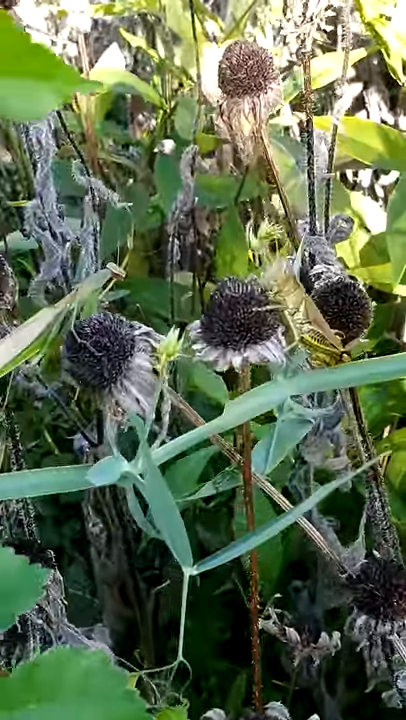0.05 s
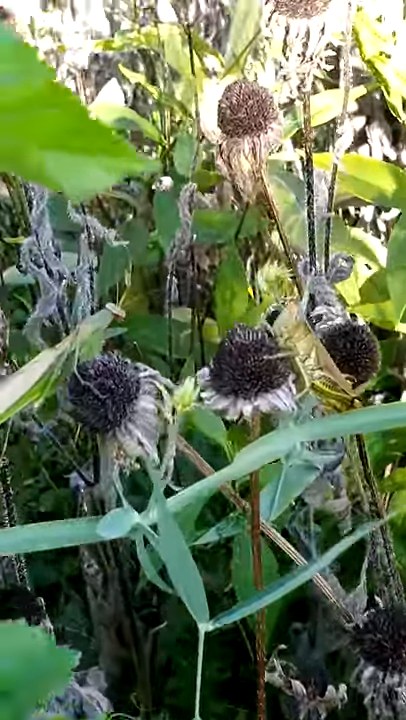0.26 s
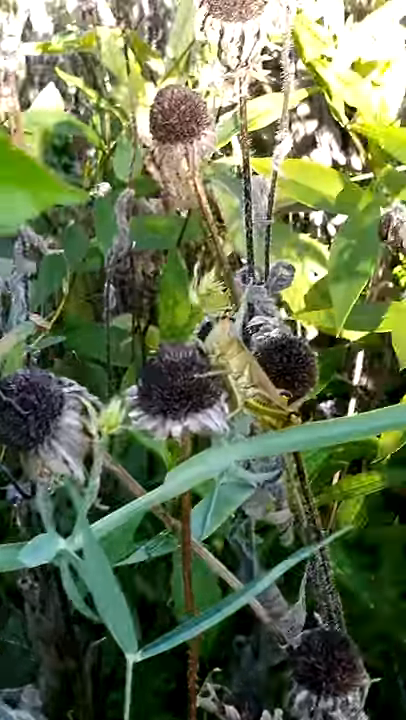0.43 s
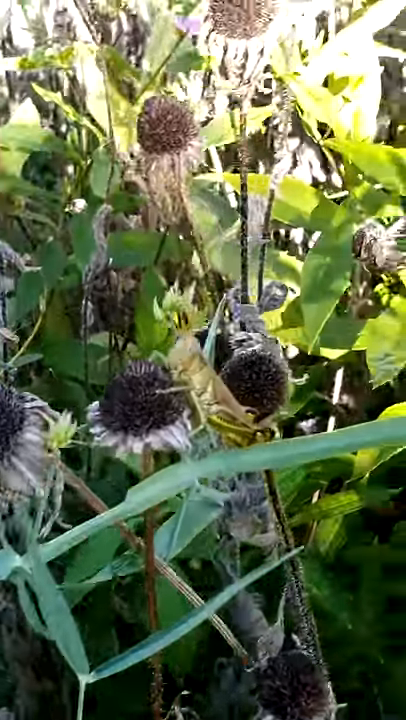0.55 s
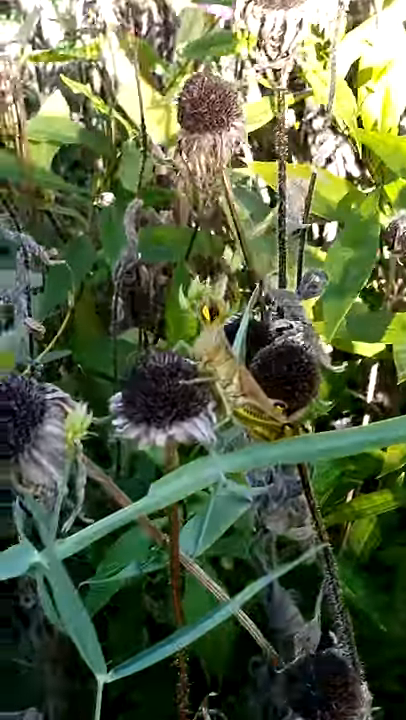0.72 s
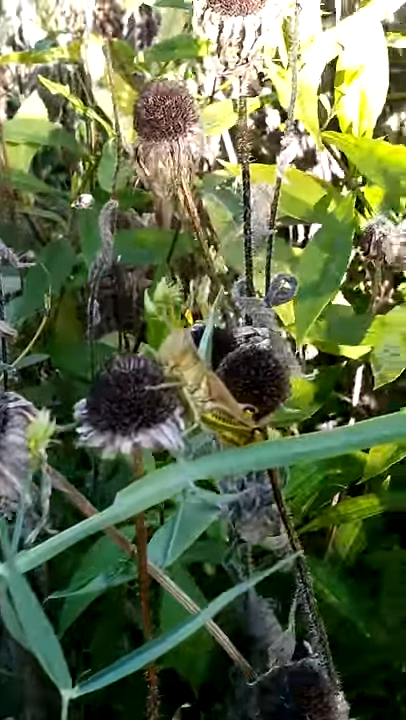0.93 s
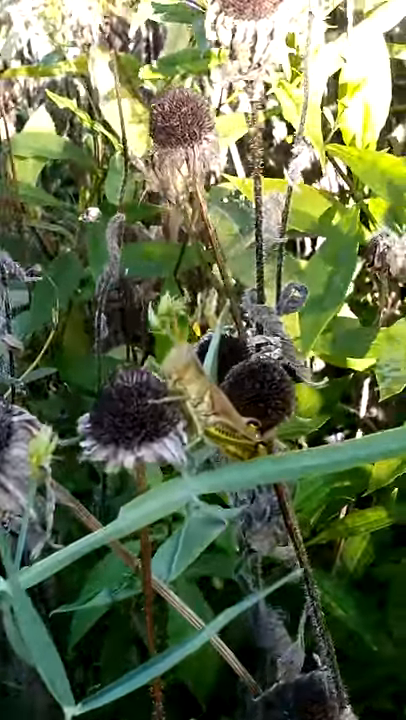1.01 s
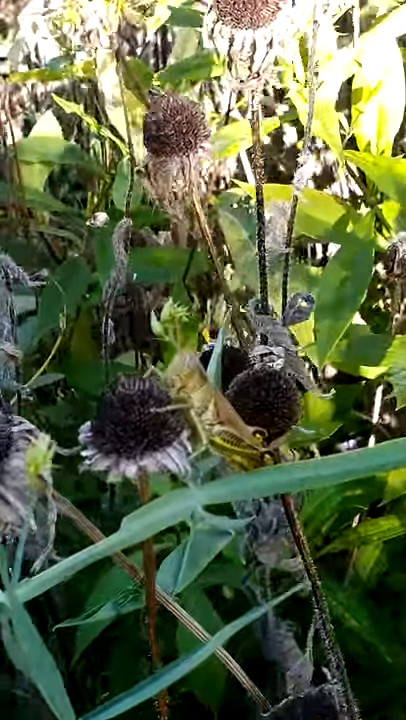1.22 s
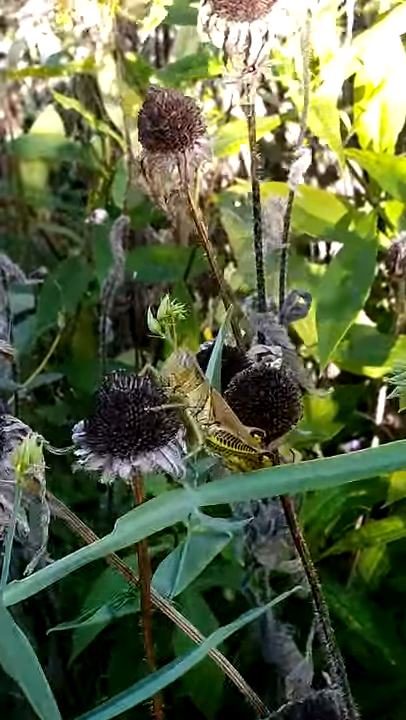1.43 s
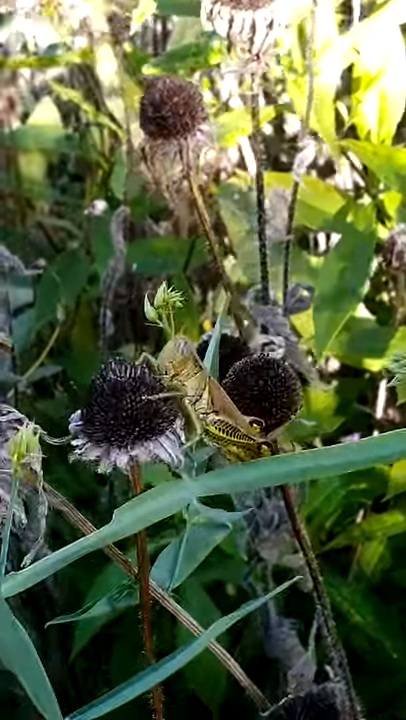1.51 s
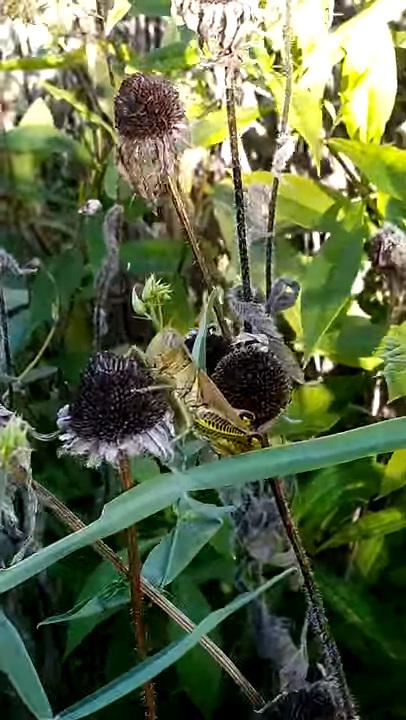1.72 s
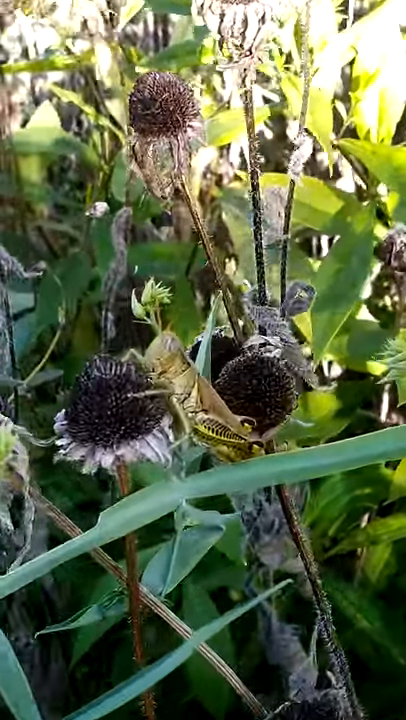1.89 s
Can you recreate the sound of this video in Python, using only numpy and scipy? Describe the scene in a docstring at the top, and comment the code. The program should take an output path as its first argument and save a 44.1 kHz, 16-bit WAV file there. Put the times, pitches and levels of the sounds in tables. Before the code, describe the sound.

Crickets chirp close by in short, high, uneven bursts in a weed patch, while fainter insects trill and buzz further off. Leaves rustle briefly at the start, and the hand-held microphone picks up soft bumps over a low, traffic-like rumble.

```python
"""A ground cricket's chirp, a brush of leaves and a few dry stem ticks open a sunny weed patch.
The crickets chirp on up front, each chirp a short run of wing strokes, while fainter insects
peep, trill and buzz further off. The hand-held microphone picks up soft bumps and two knocks.
Underneath sits a bed of light rumble and steady wash, probably distant traffic, with a far drone
and a hum that swell and fade."""
import sys
import numpy as np
from scipy import signal
from scipy.fft import rfft, irfft
from scipy.io import wavfile
from scipy.ndimage import uniform_filter1d

SR = 44100
rng = np.random.default_rng(int(sys.argv[2]) if len(sys.argv) > 2 else 0)


def materialize(psi):
    """Save the field psi as 16-bit PCM at rate SR to the path in sys.argv[1].

    A 1-D psi becomes a single channel; in a 2-D psi each row is a channel.
    """
    bounded = np.clip(np.atleast_2d(psi).T, -1, 1)
    quanta = np.round(bounded * 32767).astype(np.int16)
    wavfile.write(sys.argv[1], SR, quanta)


N = 85995
T = np.arange(N) / SR

# Pan is left minus right; likeness is the correlation of the two sides.
# rumble, traffic wash and leaf hiss: f/Hz, level/dB
AIR_SPECTRUM = [(30, -2), (62, 21), (180, 18), (255, 8), (480, 11), (640, 1.5), (950, 0.37), (1400, -5),
                (2000, -13.5), (2700, -15), (3150, -29), (3600, -21), (5200, -22.5), (5800, -18),
                (9300, -20), (10500, -28), (14500, -40)]
# stereo image of that bed: f/Hz, pan/dB, likeness
AIR_IMAGE = [(60.7, 5.5, -0.66), (248, 4.5, -1.008), (560, 6.5, -0.72), (820, 4, 0.003), (1940, 10, 0.23),
             (3700, 6, -0.057), (6400, 11, -0.13), (11000, 2.5, 0.35)]
# colour of the far drone: f/Hz, level/dB
DRONE_SPECTRUM = [(220, -51), (305, 1), (385, 1), (440, -0.5), (520, -44.5)]
# its fader ride: t/s, level/dB
DRONE_RIDE = [(0, -58), (.24, -41), (.48, -46.5), (.61, -42.5), (.82, -60)]
# swells of a distant hum: t/s, f/Hz, level/dB
HUM_SWELLS = [(.62, 445, -42), (.95, 490, -45), (1.15, 460, -46), (1.41, 485, -47)]
# handling bumps: t/s, half-width/s, level/dB, pan/dB
BUMPS = [(0.448, 0.24, -37, 8), (0.72, 0.022, -29, 16), (0.901, 0.009, -28, 17), (0.957, 0.013, -41, -11),
         (1.1, 0.065, -37, -10.5), (1.134, 0.03, -27, -2.5), (1.246, 0.032, -36.5, -6),
         (1.374, 0.0084, -25, 11), (1.68, 0.0032, -27.5, 28)]
# their colour: f/Hz, level/dB
BUMP_SPECTRUM = [(25, -58), (45, -3), (78, 3), (120, -6), (185, -15), (280, -29), (1500, -79)]
# knocks on the microphone case: t/s, level/dB
KNOCKS = [(.7185, -27), (1.13, -29)]
# modes of the case: f/Hz, level/dB, t60/s
CASE_MODES = [(118, 0, .075), (205, -4, .045), (330, -8, .025)]
# colour of brushing leaves: f/Hz, level/dB
LEAF_SPECTRUM = [(500, -34), (1400, 13.5), (2400, 4.5), (3100, -20), (4200, 2), (14000, -12)]
# dry stem ticks: t/s, level/dB, f/Hz, t60/s, pan/dB
STEM_TICKS = [(.0672, -33, 8600, .012, 16), (.073, -43, 8400, .04, 11), (.1152, -42, 8400, .014, 13),
              (.1192, -39, 7900, .025, 13), (.2495, -47.5, 7000, .014, 12), (.3415, -47, 5800, .012, 10),
              (1.5425, -51, 13000, .014, 8)]
# colour of the insect buzz: f/Hz, level/dB
BUZZ_SPECTRUM = [(4500, -20), (6000, -7.5), (7500, -2), (8800, -1), (10300, -17), (15000, -26.5)]
# its fader ride: t/s, level/dB
BUZZ_RIDE = [(0, -59.5), (.17, -58), (.72, -67.5), (.87, -60), (1.28, -62), (1.4, -56), (1.75, -55.5),
             (1.95, -57.5)]
# peeps of far, lower-pitched insects: t/s, f/Hz, level/dB
PEEPS = [(.48, 4900, -64), (0.519, 4920, -63), (0.561, 4920, -64), (.717, 4350, -68), (0.762, 4450, -64),
         (.895, 4940, -66), (.935, 4950, -63), (0.98, 4950, -64), (1.416, 4950, -62.5), (1.456, 4950, -62)]
# near chirps: t/s, first to last stroke/s, f/Hz, level/dB, fall per stroke/Hz, pan/dB
CHIRPS = [(.003, .064, 6900, -44.5, 450, 7), (0.199, .11, 6030, -56.5, 600, 12),
          (0.285, .13, 7370, -53.5, 204, 5), (0.571, .046, 7600, -40, 380, 27),
          (0.569, .073, 8430, -53, 250, 0), (0.826, .13, 7320, -45, 200, 11.5),
          (0.833, .09, 6560, -50, 497, 10), (0.87, .051, 6930, -52, 496, 38),
          (0.995, .046, 7620, -39.5, 200, 14), (1.126, .059, 7310, -41, 202, 12.5),
          (1.363, .046, 7680, -41, 310, 29), (1.386, .06, 7280, -42, 150, 24),
          (1.443, .092, 6700, -49, 400, 2.5), (1.702, .045, 7730, -41, 400, 25),
          (1.704, .048, 7280, -40.5, 300, 11)]

CYCLES_PER_STROKE = 87.5   # a faster wing gives both a higher pitch and quicker strokes
STROKE_SHARE = .97   # sounding part of each stroke period
FAR_SWING_DB, FAR_PAN_DB = 4, 5
PEEP_FALL_HZ, PEEP_JITTER_HZ = 160, 90


def from_db(db):
    """Decibels to gain."""
    return 10 ** (np.asarray(db) / 20)


def pan(db):
    """Left and right gains; the right sits db below the left."""
    return np.array([[1], [from_db(-db)]])


def ride(rows):
    """Gain along a fader curve of t/s, level/dB."""
    return from_db(np.interp(T, *np.transpose(rows)))


def at_hz(rows, column=1):
    """A table column spread over every frequency bin."""
    rows = np.array(rows)
    return np.interp(np.log(np.arange(N // 2 + 1) * SR / N + 1), np.log(rows[:, 0]), rows[:, column])


def drift(rate_hz):
    """Smooth random modulation at unit rms."""
    pole = np.exp(-2 * np.pi * rate_hz / SR)
    return rms_one(signal.lfilter([1], [1, -2 * pole, pole * pole], rng.standard_normal(2 * N))[N:])


def rms_one(x):
    """Scale to unit rms."""
    return x / np.sqrt(np.mean(x ** 2) + 1e-20)


def noise(spectrum, pan_db, likeness=0):
    """Coloured stereo noise, unit rms on the left."""
    shared, separate = rfft(rng.standard_normal((2, N)))
    likeness = np.clip(likeness, -1, 1)
    colour = from_db(at_hz(spectrum))
    blend = likeness * shared + np.sqrt(1 - likeness ** 2) * separate
    left, right = irfft(shared * colour, N), irfft(blend * colour * from_db(-pan_db), N)
    return np.array([left, right]) / left.std()


def air_bed():
    """Steady outdoor rumble, wash and hiss."""
    return from_db(-37) * noise(AIR_SPECTRUM, at_hz(AIR_IMAGE), at_hz(AIR_IMAGE, column=2))


def far_drone():
    """A low band of noise, probably a vehicle, swells and fades."""
    return ride(DRONE_RIDE) * noise(DRONE_SPECTRUM, pan_db=4.5, likeness=-.66)


def far_hum(swell_s=.04, wander_hz=28, lag_s=.0007):
    """Bell-shaped swells of a wavering tone, reaching the right a moment later."""
    tone = 0
    for s, hz, db in HUM_SWELLS:
        swell = np.exp(-.5 * ((T - s) / swell_s) ** 2)
        phase = 2 * np.pi * np.cumsum(hz + wander_hz * drift(wander_hz)) / SR
        tone = tone + from_db(db) * swell * np.sqrt(2) * np.sin(phase)
    return pan(4.5) * np.array([tone, np.interp(T - lag_s, T, tone)])


def handling_bumps():
    """The hand bumps the microphone: a levelled low shudder under bell-shaped swells."""
    power = sum((pan(pan_db) * from_db(db)) ** 2 * np.exp(-((T - s) / width) ** 2)
                for s, width, db, pan_db in BUMPS)
    shudder = noise(BUMP_SPECTRUM, pan_db=0, likeness=-.27)
    running_rms = np.sqrt(uniform_filter1d(shudder ** 2, size=1100) + 1e-6)
    return np.sqrt(power) * shudder / running_rms


def case_knocks():
    """Hard bumps set the case's well-damped modes thudding."""
    out = 0
    for s, db in KNOCKS:
        age = np.maximum(T - s, 0)
        for k, (hz, mode_db, t60) in enumerate(CASE_MODES):
            ring = from_db(db + mode_db - 60 * age / t60) * np.sin(2 * np.pi * hz * age)
            out = out + (-1) ** k * ring
    return pan(1) * out


def leaf_brush(fade_db_per_s=44):
    """Leaves brush past at the top of the scene, a quickly fading rustle."""
    return from_db(-48 - fade_db_per_s * T) * noise(LEAF_SPECTRUM, pan_db=14)


def stem_ticks(width_hz=710, attack_s=.00098, broadband_db=-7):
    """Each tick is a snap of noise through a dry stem's resonance."""
    out = np.zeros((2, N))
    radius = np.exp(-np.pi * width_hz / SR)
    for s, db, hz, t60, pan_db in STEM_TICKS:
        white = rng.standard_normal((2, N))
        resonance = [1, -2 * radius * np.cos(2 * np.pi * hz / SR), radius ** 2]
        body = rms_one(signal.lfilter([1, 0, -1], resonance, white))
        attack = np.clip((T - s) / attack_s + 1, 0, 1) ** 2
        decay = from_db(db - 60 * np.minimum(abs(T - s) / t60, 2))
        out += pan(pan_db) * attack * decay * (body + from_db(broadband_db) * white)
    return out


def plant_scatter(x, wet_db, t60=.2):
    """Leaves throw back a short diffuse tail on each side."""
    tail = rng.standard_normal((2, N)) * from_db(-60 * T / t60)
    tail /= np.sqrt(np.sum(tail ** 2, axis=1, keepdims=True))
    return x + from_db(wet_db) * signal.fftconvolve(x, tail, axes=1)[:, :N]


def wing(hz, jitter_hz=75, rasp=.18):
    """A wing rings at the rate its file's teeth are struck, a little unevenly."""
    phase = 2 * np.pi * np.cumsum(hz + jitter_hz * drift(405)) / SR
    return np.sin(phase) * (1 + rasp * drift(400))


def stroke(offset):
    """Rounded envelope of one wing stroke, for offsets from -.5 to .5."""
    return np.cos(np.pi * np.clip(offset, -.5, .5))


def far_trills():
    """Three far crickets trill throughout on neighbouring pitches, wavering in speed and level."""
    out = 0
    for hz in (7240, 7330, 7420):
        cycle = np.cumsum(hz / CYCLES_PER_STROKE + drift(3)) / SR + rng.random()
        offset = cycle % 1 - .5
        gain = from_db(-72.5 + FAR_SWING_DB * drift(3))
        out = out + gain * stroke(offset / STROKE_SHARE) * wing(hz)
    return pan(FAR_PAN_DB) * out


def far_pulses(hz=3480, pulses_per_s=30, fade_db_per_s=24):
    """A loose train of soft pips, probably a tree cricket's, fades out from the start."""
    offset = np.cumsum(pulses_per_s + 2 * drift(8)) / SR % 1 - .5
    envelope = from_db(-64 - fade_db_per_s * T + FAR_SWING_DB * drift(15)) * stroke(offset) ** 2
    return pan(FAR_PAN_DB) * envelope * wing(hz - PEEP_FALL_HZ * offset, PEEP_JITTER_HZ)


def far_peeps(length_s=.036, flutter_depth=.6):
    """Far insects sound short fluttering notes that bend slightly down."""
    out = 0
    for s, hz, db in PEEPS:
        offset = np.clip((T - s) / length_s, -.5, .5)
        flutter = 1 + flutter_depth * np.sin(2 * np.pi * (T - s) * hz / CYCLES_PER_STROKE)
        tone = wing(hz - PEEP_FALL_HZ * offset, PEEP_JITTER_HZ)
        out = out + from_db(db) * flutter * stroke(offset) ** 2 * tone
    return out


def katydid_buzz(strokes_per_s=120, depth=.17):
    """A toneless buzz, probably a meadow katydid's, throbs with each wing stroke."""
    throb = 1 + depth * np.cos(2 * np.pi * np.cumsum(strokes_per_s + drift(12)) / SR)
    return ride(BUZZ_RIDE) * throb * noise(BUZZ_SPECTRUM, pan_db=6)


def ground_crickets(arch_db=5, arch_hz=110, spread_db=1.8, lag_s=.0002):
    """Runs of wing strokes, each falling in pitch; a chirp's end strokes are softer and lower."""
    out = np.zeros((2, N))
    for s, length, hz, db, fall_hz, pan_db in CHIRPS:
        strokes_per_s = hz / CYCLES_PER_STROKE
        cycle = (T - s) * strokes_per_s
        index, last = np.round(cycle), max(np.round(length * strokes_per_s), 1)
        edge = np.minimum((2 * index / last - 1) ** 2, 1)   # 0 mid-chirp, 1 at either end
        uneven = rng.standard_normal(size=64)[index.astype(int) % 64]   # one draw per stroke
        offset = (cycle - index) / STROKE_SHARE
        gate = (index >= 0) * (index <= last)
        envelope = gate * stroke(offset) * from_db(db - arch_db * edge + spread_db * uneven)
        out += pan(pan_db) * envelope * wing(hz - fall_hz * offset + arch_hz * (.5 - edge))
    left, right = out
    return np.array([np.interp(T - lag_s, T, left), right])   # the left arrives a touch late


def scene():
    """The mix: crickets up front, far insects wetter, plant and handling sounds over the bed."""
    near = plant_scatter(ground_crickets(), wet_db=-7)
    far = plant_scatter(far_peeps() + far_trills() + far_pulses(), wet_db=-3) + katydid_buzz()
    foley = stem_ticks() + leaf_brush() + handling_bumps() + case_knocks()
    return near + far + foley + far_hum() + air_bed() + far_drone()


def record(dry, low_cut_hz=27, high_cut_hz=15300):
    """The microphone rolls off the deepest bass; the top is cut steeply."""
    thinned = signal.sosfilt(signal.butter(4, low_cut_hz, "high", fs=SR, output="sos"), dry)
    return signal.sosfiltfilt(signal.ellip(10, .05, 70, high_cut_hz, fs=SR, output="sos"), thinned)


dry = scene()
out = record(dry)
materialize(out)
```